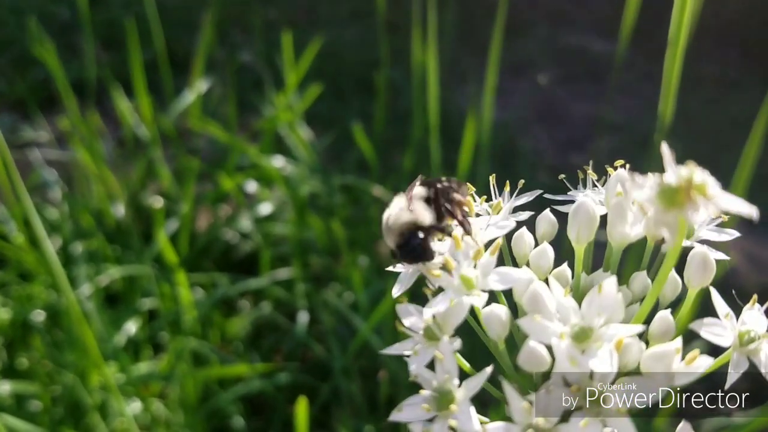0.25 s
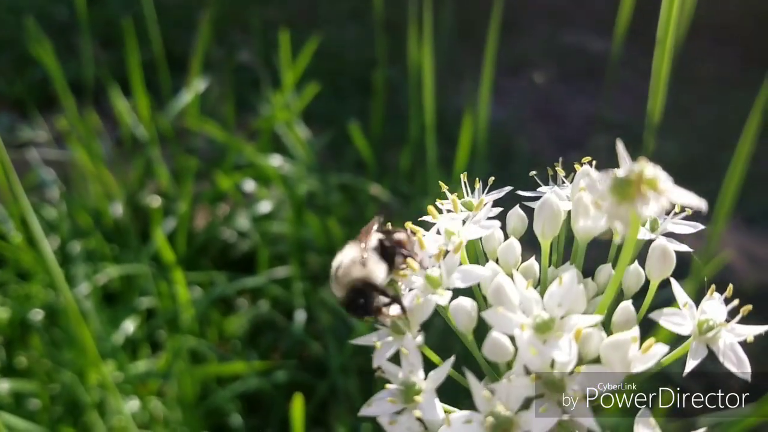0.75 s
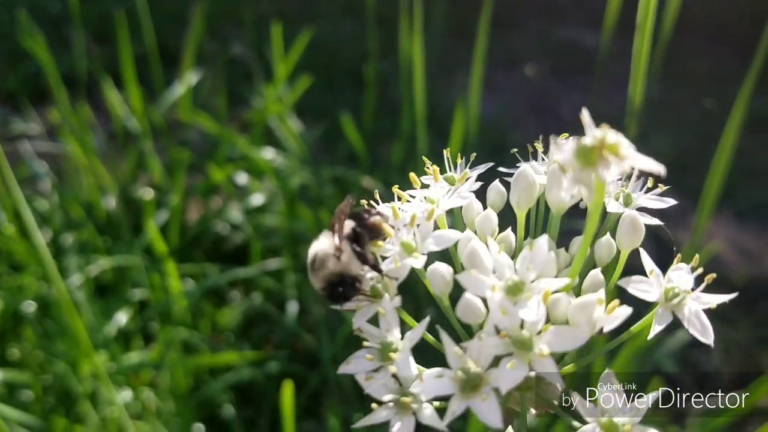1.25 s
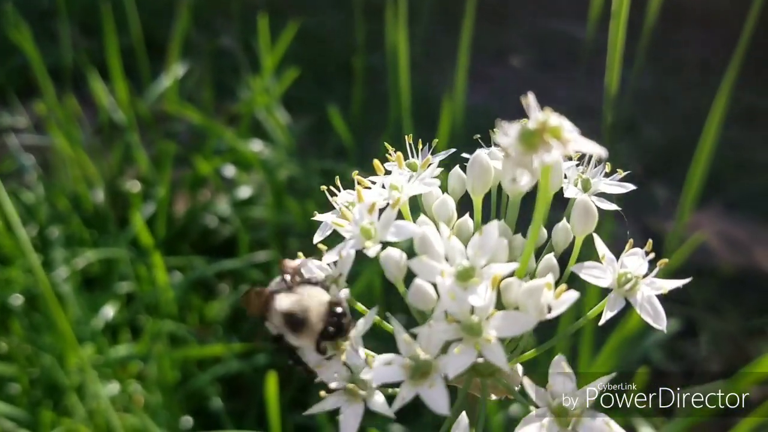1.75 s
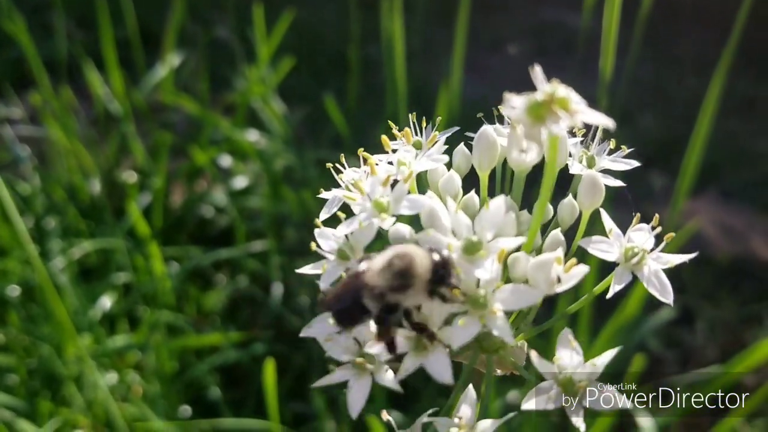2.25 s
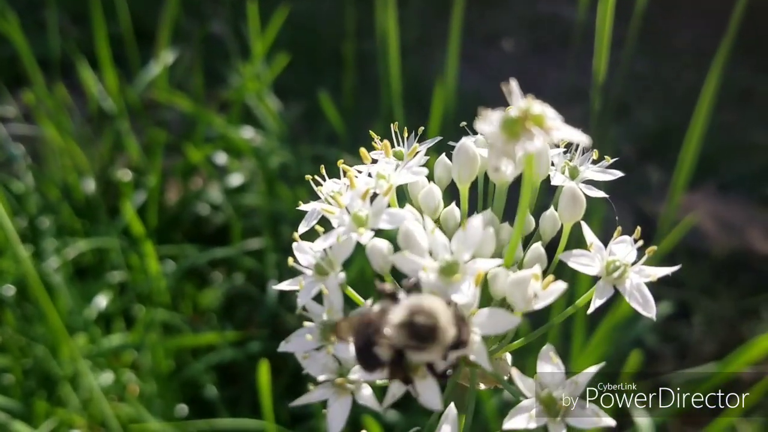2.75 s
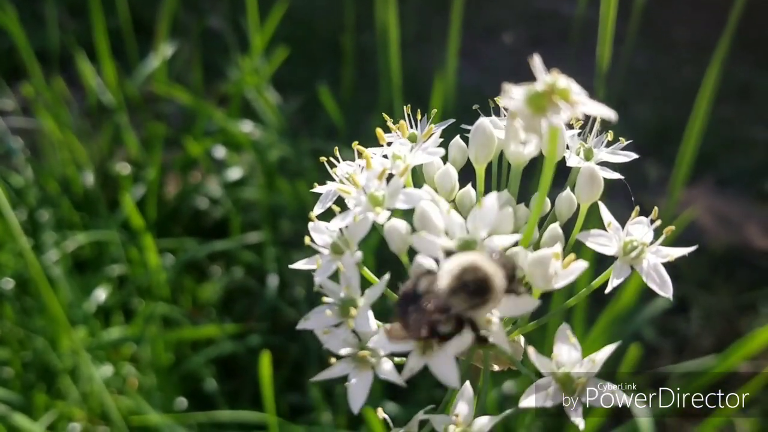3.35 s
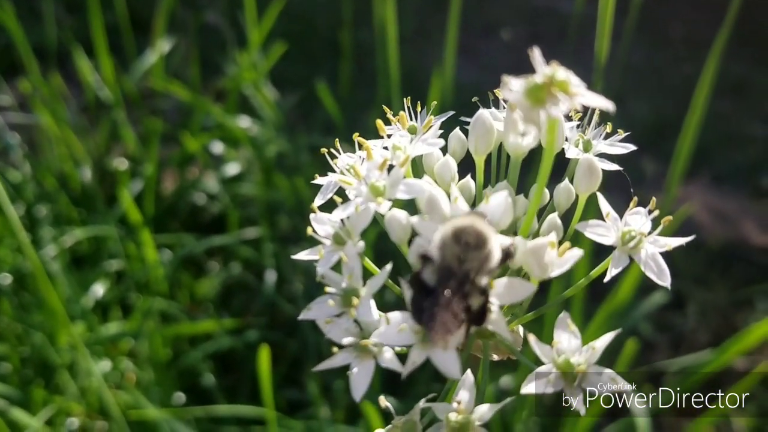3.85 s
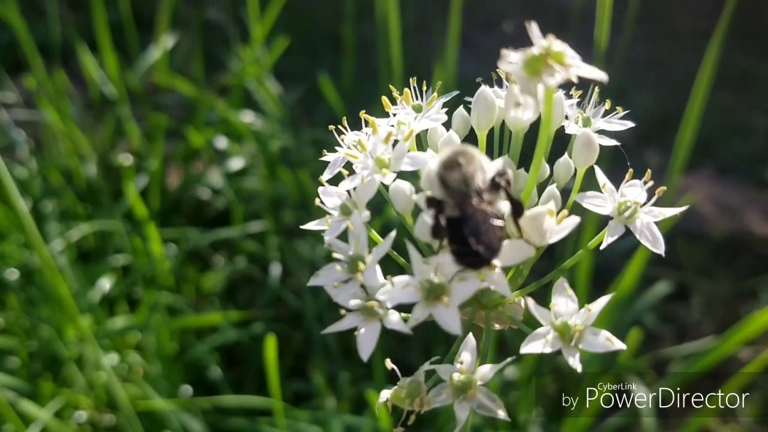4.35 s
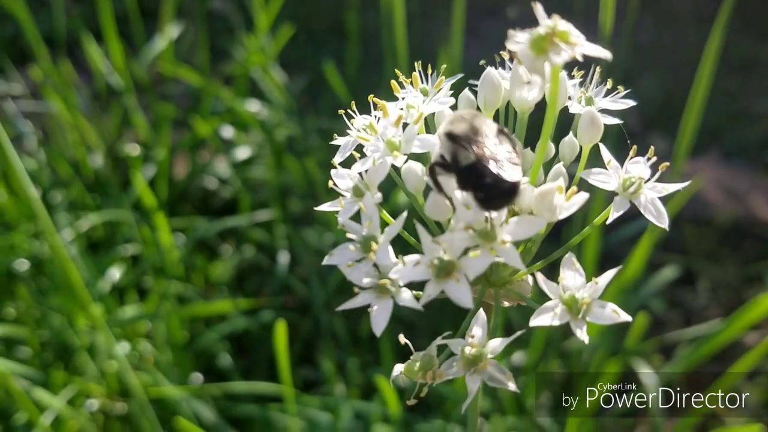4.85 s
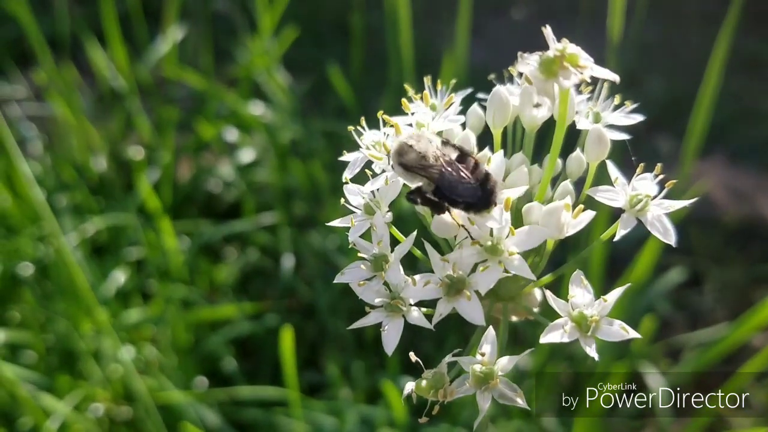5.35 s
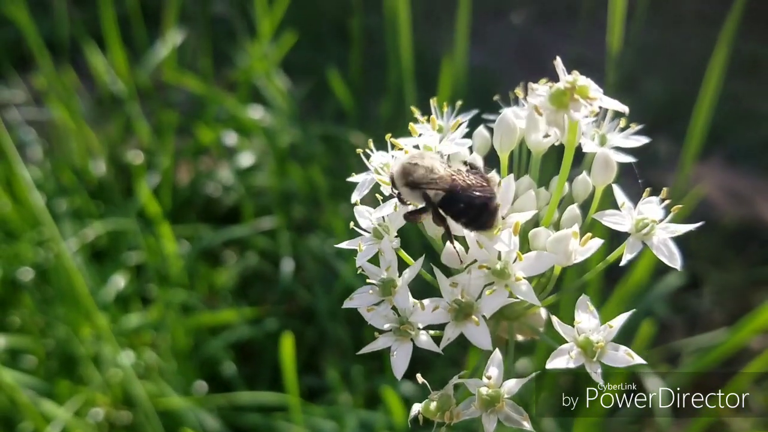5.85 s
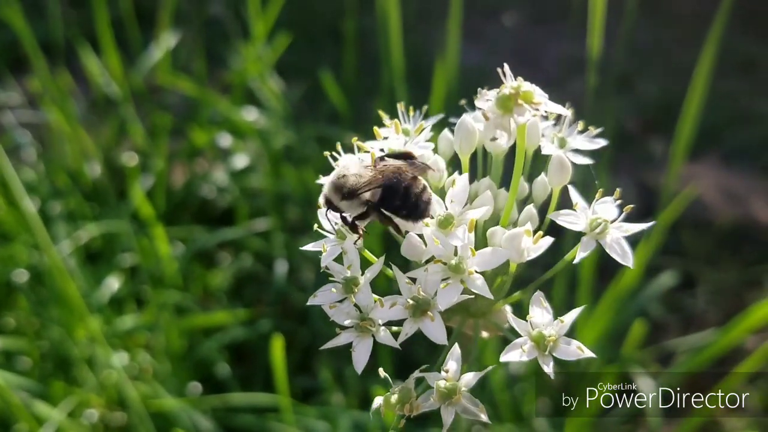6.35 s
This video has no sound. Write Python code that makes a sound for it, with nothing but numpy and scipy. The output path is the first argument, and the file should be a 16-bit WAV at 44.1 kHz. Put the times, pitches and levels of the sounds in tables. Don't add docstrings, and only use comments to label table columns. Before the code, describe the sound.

A rapid throbbing cicada rattle fills the foreground, brighter on the right, over a fine high katydid buzz and far insect chorus. The song peaks around two to three seconds, weakens and dies away, leaving a thin hiss and a few very high ticking rasps at the end. Underneath are a weak wavering bee hum, low breeze rumble, finger rustle and dull knocks on the handheld microphone, heaviest past the middle. Open garden, little echo.

```python
import sys
import numpy as np
from scipy import signal
from scipy.fft import rfft, irfft
from scipy.io import wavfile
from scipy.ndimage import uniform_filter1d

SR = 44100
rng = np.random.default_rng(int(sys.argv[2]) if len(sys.argv) > 2 else 0)


def pcm_store(signal):
    levels = np.round(np.clip(np.atleast_2d(signal), -1, 1) * 32767)
    wavfile.write(sys.argv[1], SR, levels.astype(np.int16).T)


def volts_from_db(level):
    exponent = np.asarray(level, float) / 20
    return 10 ** exponent


N = 291060

# (time [s], rate [pulses/s])
PULSE_RATE = [
    (0, 231),
    (2.8, 230.5),
    (3.1, 204),
    (3.6, 200),
    (4.3, 188),
    (5.0, 165),
    (6.6, 160),
]


def cicada():
    # (time [s], ringing level [dB], throb strength [dB])
    effort = [(0.0, -43.5, -32), (0.45, -41.5, -33), (1.1, -41.5, -29.5), (1.6, -38.5, -28.5),
              (2.08, -37.5, -30), (2.74, -37.5, -31), (2.84, -40, -34.5), (3.0, -42.5, -32.5),
              (3.1, -42, -32), (3.75, -42.5, -33), (4.6, -45, -34.5), (5.1, -48.5, -41),
              (5.65, -54.5, -43.5)]
    # (time [s], throbs so far [count])
    tempo = [(.066, 0), (1.663, 19), (2.987, 35), (3.067, 36), (3.21, 38), (3.624, 44), (3.869, 48),
             (4.002, 50), (4.639, 60), (5.04, 66), (5.319, 70), (5.622, 74)]
    # (frequency [Hz], width [Hz], left level [dB], right level [dB])
    throb_modes = [(4810, 140, -17, -8), (4935, 110, -13, -8), (5092, 140, -7, -1), (5300, 110, -4, 1)]
    # (frequency [Hz], width [Hz], left [dB], right [dB])
    tense_modes = [(5410, 48, -10.5, -6), (5475, 68, -8, -1), (5765, 110, -18, 2), (6270, 134, 1.5, 2),
                   (6447, 260, -42, -7)]
    # (frequency [Hz], width [Hz], left level [dB], right level [dB])
    ring_modes = [(4570, 290, -10, -13.5), (5355, 530, -5, -1.5), (5752, 380, -10, 0.5), (5886, 200, -4, 2),
                  (6210, 90, 7.5, -25), (6488, 107, -3.5, 0), (6817, 170, -1, -24), (7370, 93, -9.5, -45)]
    # (frequency [Hz], width [Hz], left level [dB], right level [dB])
    low_modes = [(2073, 220, -22, -17), (2500, 400, -36, -12), (2837, 210, -3.5, -4.5),
                 (3190, 108, -6, 5.5), (3505, 130, -2, 3.5), (3610, 350, 0, 0), (3960, 364, -12, 1.5),
                 (4510, 190, -16, -2)]

    anchor_s, done = np.transpose(tempo)
    throb_s = np.interp(np.arange(done[-1] + 1), done, anchor_s)
    ring_db, strength_db = in_time(effort)
    throb_db = strength_db[(throb_s * SR).astype(int)]
    low_db = -50 + 0.7 * (ring_db - ring_db[0])
    tension_db = -0.4 + 0.04 * (in_time(PULSE_RATE)[0] - PULSE_RATE[0][1])

    t = np.arange(N) / SR
    pause = uniform_filter1d(1. * (t > 3.024) * (t < 3.054), size=500)
    singing = volts_from_db(-8 * pause) * (t < 5.645)
    near = tymbal(jitter=.004, rough=0.54, burst=1.0) * singing
    far = tymbal(jitter=.035, rough=0.72, burst=1.0) * singing

    tired, stretch = throb_s > 4.8, 1.6
    throb = bump(throb_s, volts_from_db(throb_db - 5.0) * ~tired, rise=0.011, fall=0.013)
    throb = throb + bump(throb_s, volts_from_db(throb_db - 4.5) * tired, 0.014 * stretch, 0.0072 * stretch)
    grace = bump(throb_s - .025, volts_from_db(throb_db - 8.0) * (throb_s < 3.0), rise=0.0047, fall=0.0027)
    hush = 1 - 0.24 * bump(throb_s - .014, 0.56, rise=0.015, fall=0.0072)
    damped = 1 - 0.45 * bump(throb_s, 0.95, rise=0.05, fall=0.03)

    opened = evened(resonances(near, throb_modes), 0.0066)
    opened = opened - volts_from_db(tension_db) * evened(resonances(near, tense_modes), 0.029)
    bright = (throb + grace) * opened
    ringing = volts_from_db(ring_db + 4.0) * hush * evened(resonances(far, ring_modes), 0.059)
    low = volts_from_db(low_db + 8.0) * damped * resonances(far, low_modes)
    song = late_left(bright, count=2) + late_left(ringing, count=28)
    song = song + garden(late_left(low, count=-6), wet_db=-11, t60=0.12)
    return garden(song, wet_db=-13, t60=.15)


def tymbal(jitter, rough, burst):
    cycles = np.cumsum(in_time(PULSE_RATE)[0] * (1 + jitter * drift(60))) / SR
    clicks = np.diff(np.floor(cycles), prepend=0) * 18.3
    rib_band = signal.butter(2, [4700, 6600], "band", fs=SR, output="sos")
    band = signal.sosfilt(rib_band, rng.standard_normal(N))
    steady = rms_one(band / np.sqrt(uniform_filter1d(band ** 2, size=90) + 1e-9))
    crackle = (steady + 0.74 * rng.standard_normal(N)) * np.exp(-(cycles % 1) / burst)
    return clicks * (1 - np.clip(rough, 0, 1)) + rough * crackle


def resonances(x, modes):
    out = 0
    for k, (hz, width, left_db, right_db) in enumerate(modes):
        r = np.exp(-np.pi * 1.55 * width / SR)
        section = [(1 - r * r) / 2, 0, (r * r - 1) / 2, 1, -2 * r * np.cos(2 * np.pi * hz / SR), r * r]
        ears = volts_from_db(np.array([[left_db], [right_db]]))
        out = out + (-1) ** k * ears * signal.sosfilt([section, section], x)
    return rms_one(out)


def evened(x, seconds):
    power = uniform_filter1d(np.mean(x ** 2, axis=0), size=round(seconds * SR))
    return rms_one(x / np.sqrt(power + 0.058))


def garden(x, wet_db, t60):
    t = np.arange(round(.3 * SR)) / SR
    tail = rng.standard_normal((2, len(t))) * volts_from_db(-60 * t / t60) * (t > .004)
    tail /= np.sqrt(np.sum(tail ** 2, axis=1, keepdims=True))
    return x + volts_from_db(wet_db) * signal.fftconvolve(x, tail, axes=1)[:, :N]


def buzzing_katydid():
    # (time [s], level [dB])
    buzz = [
        (0.0, -54.5),
        (2.4, -54.5),
        (4.5, -56.5),
        (5.33, -61.5),
        (6.25, -78),
    ]
    # (frequency [Hz], density [dB/Hz])
    scrape_spectrum = [(8700, -17.5), (9100, -3), (10200, -2), (11000, -2), (12500, 2.5), (13600, -10),
                       (15500, -17)]
    # (frequency [Hz], density [dB/Hz])
    overtone_spectrum = [(12800, -30), (13700, -7), (15000, -6), (15600, -19)]
    strokes = 1 + .1 * np.sin(2 * np.pi * 43.5 * np.arange(N) / SR + 1.5 * drift(1.5))
    body_db, = in_time(buzz)
    press = swell(start=1.74, rise=.7, end=4.1, fall=.9)
    top_db = -69.5 + 9.0 * press + 0.32 * (body_db - body_db[0])
    body = volts_from_db(body_db + 1.5 + 1.0 * drift(6.9)) * diffuse_noise(scrape_spectrum)
    top = volts_from_db(top_db + 3.5 + 1.6 * drift(10)) * diffuse_noise(overtone_spectrum)
    return strokes * (body + top)


def ticking_katydid():
    first_s, gap_s = 6.264, .0627
    turn = np.arange(6)
    rasp_gain = volts_from_db(-46 - 3 * (turn % 2) - 4)
    rasps = bump(first_s + gap_s * turn + .004, rasp_gain, rise=.004, fall=.008)
    whirr = volts_from_db(-57) * (np.arange(N) > (first_s - .03) * SR)
    high_pass = signal.butter(4, 11000, "high", fs=SR, output="sos")
    return (rasps + whirr) * signal.sosfilt(high_pass, rng.standard_normal((2, N)))


def bumblebee():
    # (time [s], hum level [dB])
    wing_effort = [(0.0, -66.5), (1.42, -67), (1.8, -51), (2.65, -59.5), (3.22, -56.5), (3.75, -59.5),
                   (4.26, -51), (4.52, -54), (5.13, -62.5), (5.81, -82), (6.6, -60)]
    hum_db, = in_time(wing_effort)
    wing_hz = 105 * (1 + .09 * drift(6.97))
    phase = 2 * np.pi * np.cumsum(wing_hz) / SR
    hum = volts_from_db(hum_db + 1.6 * drift(5.8)) * (np.sin(phase) + 0.33 * np.sin(2 * phase))
    return hum * volts_from_db(np.array([[-2.5], [2.5]]))


def breeze():
    # (frequency [Hz], density [dB/Hz])
    gust_spectrum = [(15, -37), (25, -19), (48, -2.5), (113, -2), (166, -6), (211, -8), (343, -27),
                     (458, -28.5), (500, -28), (650, -34), (1100, -120)]
    blow_db = -63 + 13.0 * swell(start=1.005, rise=0.33, end=4.67, fall=0.42)
    ears_db = np.array([[-2.5], [1.5]])
    return volts_from_db(blow_db + 0.3 * drift(2.7) + ears_db) * diffuse_noise(gust_spectrum)


def grip():
    rest = swell(start=1.55, rise=1.1, end=4, fall=.45)
    shift = swell(start=4.4, rise=0.33, end=4.6, fall=0.3)
    grip_db = -67.5 - 5 * rest + 8 * shift
    rustle = diffuse_noise([(120, -30), (230, -7), (450, -6.5), (800, -26.5)])
    return volts_from_db(grip_db + 4.1 * drift(23)) * rustle


def knocks():
    # (time [s], peak level [dB], ring frequency [Hz], left minus right [dB], snap [0-1])
    housing_knocks = [(0.775, -49, 116, -14, 0.24), (0.827, -52, 138, -14, 0.1),
                      (1.359, -42, 61.9, -13, 0.2), (1.611, -42, 133, -14, 0.1),
                      (2.119, -52, 64.6, -11, 0.02), (3.612, -40, 133, 0, 0.02), (3.934, -42.5, 191, 0, 0),
                      (4.329, -44.5, 94.2, -15, 0.15), (4.373, -30.5, 87, -14, 0.05),
                      (4.41, -25.5, 95, -15.5, 0.04), (4.459, -38, 75, -19, 0.1),
                      (4.49, -45, 110, -16, 0.25), (4.593, -34.5, 111, -15, 0.16),
                      (4.602, -33, 61, -6, 0.02), (4.613, -28.5, 121, -6.5, 0.1),
                      (4.639, -39, 90, -19, 0.04), (4.663, -47, 82, -20, 0.3),
                      (5.211, -47.5, 96.9, -11, 0.5), (5.484, -52, 108, -3.0, 0.3),
                      (5.762, -48, 93, -9, 0.55)]
    # (time [s], peak level [dB], ring frequency [Hz], left minus right [dB], snap [0-1])
    finger_taps = [
        (0.77, -43.5, 262, -10, 0.26),
        (0.961, -50.5, 240, -7, 0.1),
        (0.992, -51.5, 260, -18, 0.1),
        (4.6032, -41.5, 330, -5, 0.51),
        (4.727, -28.5, 216, -9, 0.03),
        (5.206, -47, 239, -14, .05),
    ]
    hits = housing_knocks + finger_taps
    out, t = np.zeros((2, N)), np.arange(round(.12 * SR)) / SR
    snap_band = signal.butter(2, [250, 800], "band", fs=SR, output="sos")
    snaps = signal.sosfilt(snap_band, rng.standard_normal((len(hits), len(t))))
    housing = signal.butter(4, 480, fs=SR, output="sos")
    for (s, peak_db, hz, pan_db, snap), noise in zip(hits, snaps):
        ring_cycles = max(5.5 - 0.44 * max(peak_db + 33.5, 0), 1)
        decay = volts_from_db(-60 * t * hz / ring_cycles)
        cycles = hz * t + 0.28 * (1 - np.exp(-hz * t / 0.17))
        onset = np.sin(np.pi / 2 * np.minimum(cycles / 0.87, 1)) ** 2
        ring = signal.sosfilt(housing, -np.sin(2 * np.pi * cycles) * onset * decay)
        crack = 9.3 * snap * noise * (t / 0.0014) * np.exp(-t / 0.0017)
        i = round((s - .0009) * SR)
        ears = volts_from_db(peak_db + pan_db * np.array([[.5], [-.5]]))
        out[:, i:i + len(t)] += ears * (ring / np.abs(ring).max() + crack)
    return late_left(out, count=-8)


def far_chorus():
    # (frequency [Hz], density [dB/Hz])
    chorus_spectrum = [(880, -27), (1500, -33), (1990, -10), (2350, -6.5), (3150, -6), (3800, -2.5),
                       (4850, 1.5), (6130, 2), (6820, -1), (8880, -23.5), (9990, -8.5), (12000, -16),
                       (15500, -28)]
    return volts_from_db(-44 + .5 * drift(16.0)) * diffuse_noise(chorus_spectrum)


def open_air():
    # (frequency [Hz], density [dB/Hz])
    air_spectrum = [(18, -33), (30, -32), (54, 1.5), (81, -13), (118, -2), (255, -14.5), (314, -6),
                    (360, -13), (955, -8), (1800, -16.5), (2340, -45), (3960, -120)]
    return volts_from_db(-61) * diffuse_noise(air_spectrum)


def diffuse_noise(spectrum):
    # (frequency [Hz], left-right likeness [-1 to 1])
    likeness = [(40, 0.57), (130, 1), (300, 0.66), (600, -0.097), (1400, -0.4), (3000, 0.34), (7000, 0.059),
                (15000, -0.062)]
    # (frequency [Hz], left minus right [dB])
    lean = [(60, 0.5), (110, 1), (200, 3.5), (380, -2.5), (700, -0.5), (1290, -1.5), (2380, -1), (4400, -5),
            (8120, -1.5), (15000, -3.5)]
    hz = np.fft.rfftfreq(N, 1 / SR)
    mid, side = rfft(rng.standard_normal((2, N)))
    alike = np.clip(at_hz(likeness, hz), -1, 1)
    lean_db = at_hz(lean, hz) * [[.5], [-.5]]
    ears = np.sqrt(1 + alike) * mid + np.sqrt(1 - alike) * side * [[1], [-1]]
    return rms_one(irfft(ears * volts_from_db(at_hz(spectrum, hz) + lean_db), N))


def late_left(x, count):
    return np.array([np.roll(x[0], count), x[1]])


def bump(times, gains, rise, fall):
    marks, t = np.zeros(N), np.arange(round(.08 * SR)) / SR
    marks[np.round((np.array(times) - rise) * SR).astype(int).clip(0, N - 1)] = gains
    attack = np.sin(np.pi / 2 * np.clip(t / (.5 * rise), 0, 1)) ** 2
    release = np.exp(-(np.maximum(t - rise, 0) / fall) ** 2)
    return signal.fftconvolve(marks, attack * release)[:N]


def swell(start, rise, end, fall):
    t = np.arange(N) / SR
    return np.clip(np.minimum((t - start) / rise, 1 - (t - end) / fall), 0, 1)


def drift(rate):
    r = np.exp(-80 * np.pi * rate / SR)
    slow = signal.lfilter([1], [1, -2 * r, r * r], rng.standard_normal(N // 40 + 2002))[2000:]
    return np.interp(np.arange(N) / 40, np.arange(len(slow)), rms_one(slow))


def in_time(rows):
    s, *columns = np.transpose(rows)
    return [np.interp(np.arange(N) / SR, s, c, right=c[-1]) for c in columns]


def at_hz(points, hz):
    point_hz, value = np.array(points).T
    return np.interp(np.log(hz + 1), np.log(point_hz), value)


def rms_one(x):
    return x / np.sqrt(np.mean(x ** 2) + 1e-20)


def scene():
    insects = cicada() + buzzing_katydid() + ticking_katydid() + bumblebee()
    return insects + breeze() + grip() + knocks() + far_chorus() + open_air()


def low_pass(x):
    return signal.sosfilt(signal.butter(12, 15560, fs=SR, output="sos"), x)


def record(dry):
    mix = dry - .0006
    return low_pass(mix)


dry = scene()
out = record(dry)
pcm_store(out)
```